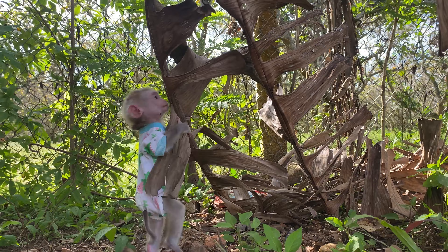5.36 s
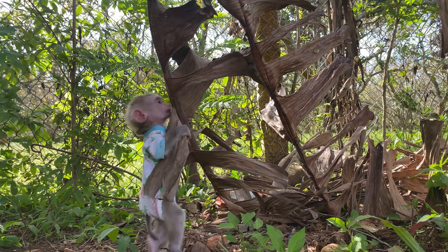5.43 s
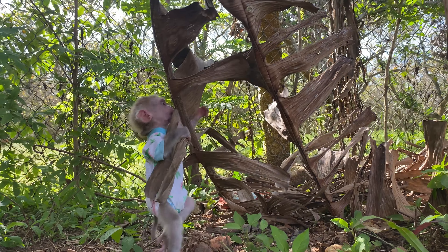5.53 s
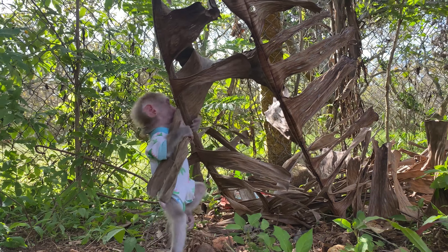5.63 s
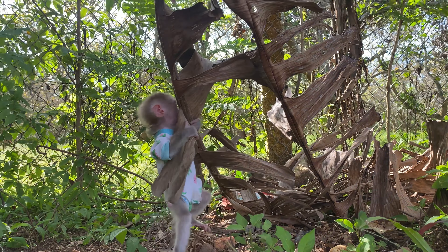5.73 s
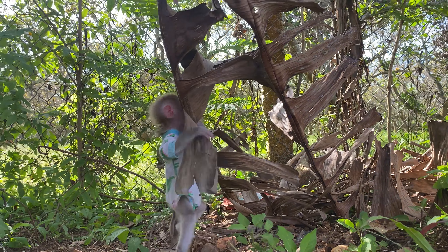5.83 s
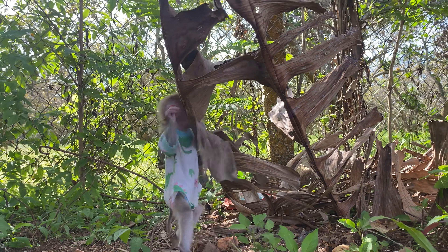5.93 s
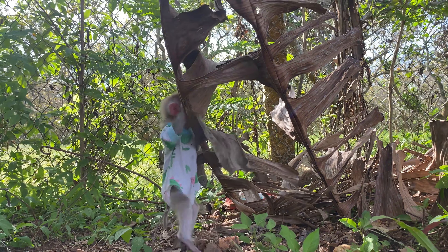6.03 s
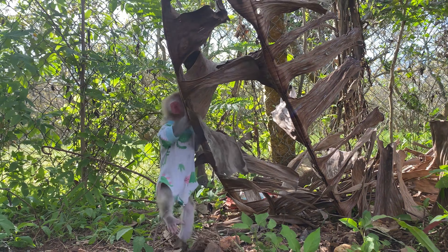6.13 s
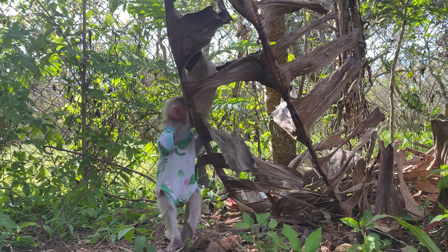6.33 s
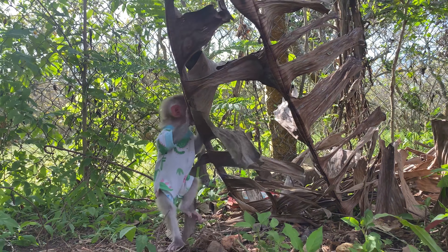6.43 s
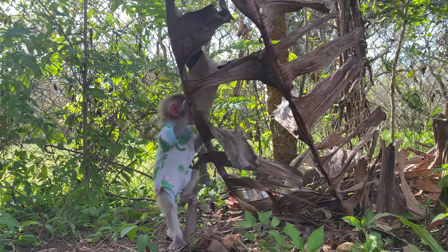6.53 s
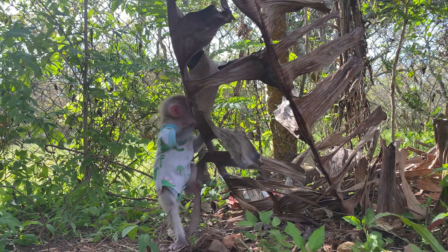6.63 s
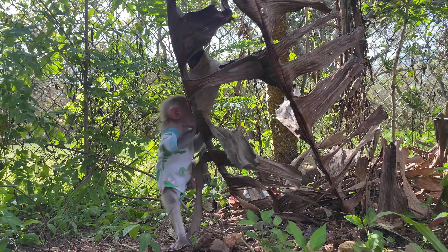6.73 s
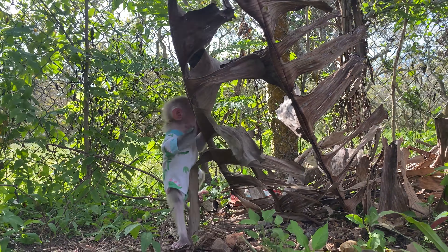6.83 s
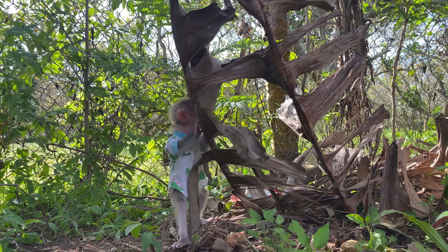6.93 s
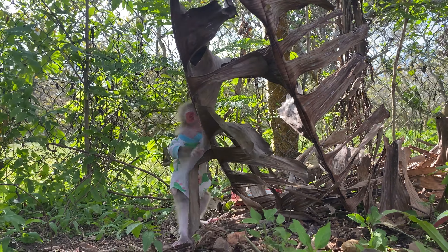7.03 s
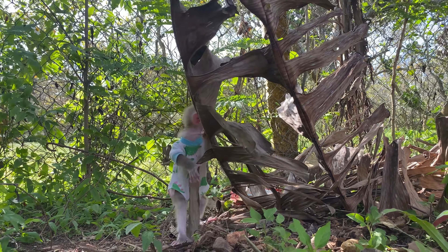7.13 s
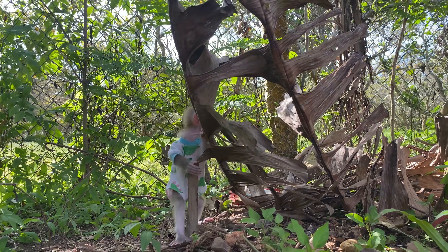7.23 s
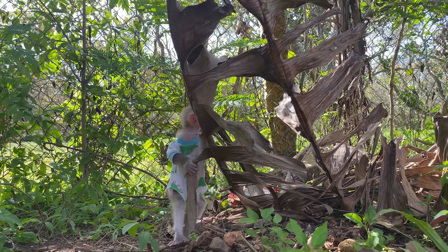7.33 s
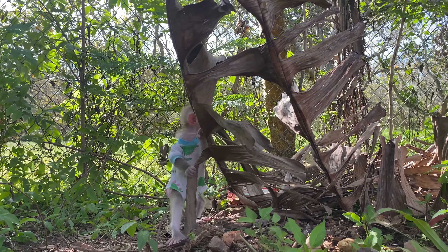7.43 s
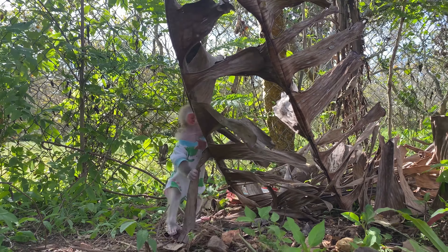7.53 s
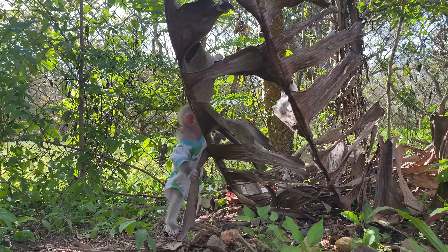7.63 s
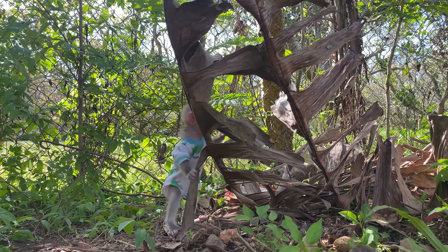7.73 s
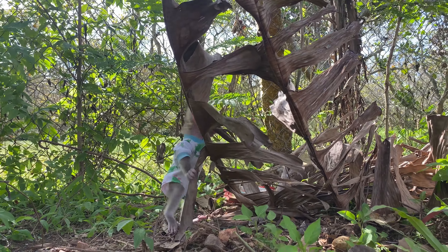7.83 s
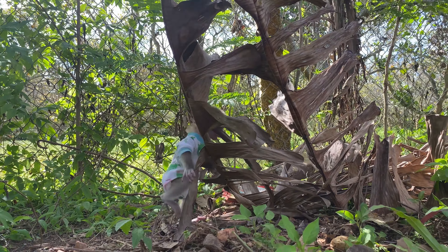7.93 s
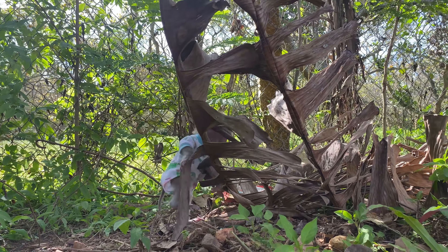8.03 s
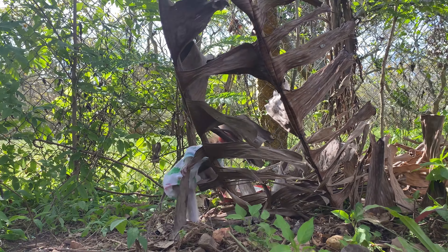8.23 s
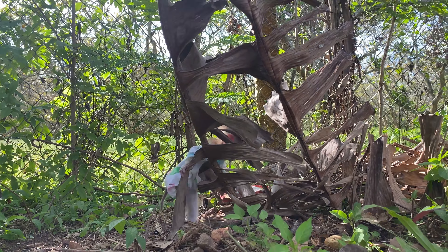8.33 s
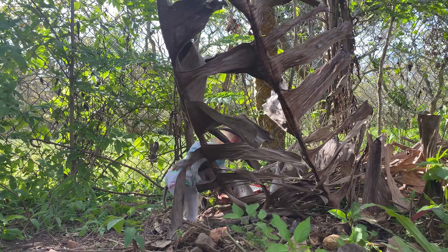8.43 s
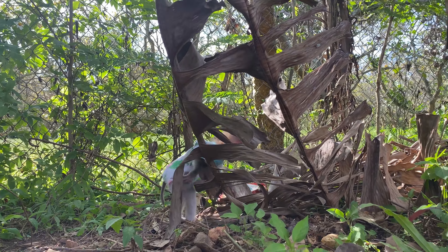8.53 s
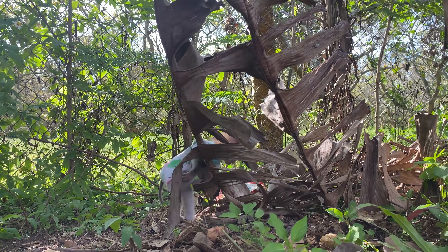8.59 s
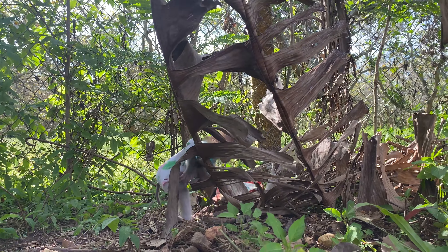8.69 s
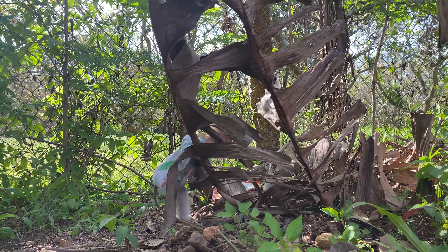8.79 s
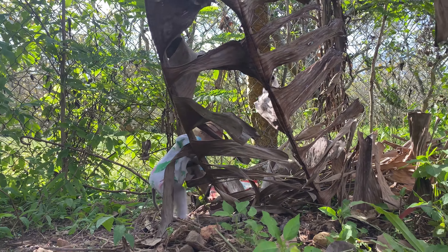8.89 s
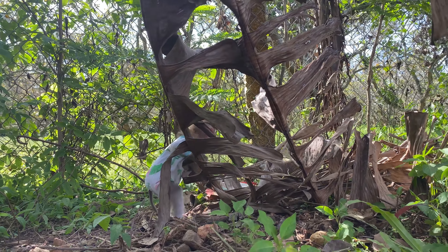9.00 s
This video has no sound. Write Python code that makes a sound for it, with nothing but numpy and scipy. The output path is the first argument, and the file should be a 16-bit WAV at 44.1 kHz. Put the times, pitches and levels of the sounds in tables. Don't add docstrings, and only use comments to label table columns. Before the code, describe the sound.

A small monkey tugs at large dry palm leaves in a garden, very close to a phone. Dense scraping and crackling open, with loud snaps in the first second, and gusts thump low on the microphone. Just after two seconds the wind grows sheltered; separate crackles, cracks and dull stalk taps follow, thinning out. A faint high insect trill flutters in near the end.

```python
import sys
import numpy as np
from scipy import signal
from scipy.fft import rfft, irfft, next_fast_len
from scipy.io import wavfile
from scipy.ndimage import uniform_filter1d, map_coordinates

SR = 44100
rng = np.random.default_rng(int(sys.argv[2]) if len(sys.argv) > 2 else 0)


def volts_from_decibels(level):
    exponent = np.asarray(level, float) / 20
    return 10 ** exponent


def int16_out(signal):
    q = np.round(np.clip(np.atleast_2d(signal).T, -1, 1) * 32767)
    wavfile.write(sys.argv[1], SR, q.astype(np.int16))


N = 399546
CHANGE_S = 2.2
CROSS_HZ = 6150

# hz, level_db
BLADE_COLOUR = [(500, -37), (1350, -4), (2200, -1.5), (3300, 1.5), (4700, -1), (6200, -4), (8500, -1),
                (11000, -70)]
# hz, level_db
STALK_COLOUR = [(80, -21.5), (200, -7.5), (420, -7.5), (680, -8), (1100, -6), (2500, -26)]
# hz, level_db
FIZZ_COLOUR = [(6500, -16.5), (9000, -5), (12000, -8), (15600, -7), (16000, -86), (16800, -65),
               (17000, -100)]

STALK_HZ = 481
KNOCK_FIZZ_DB = -19


def unit(x):
    return x / np.sqrt(np.mean(x ** 2) + 1e-20)


def along(points, hz):
    f, v = np.transpose(points)
    return np.interp(np.log(hz + 1), np.log(f + 1), v)


def curves(rows):
    s, *cols = np.transpose(rows)
    return [np.interp(np.arange(N) / SR, s, c) for c in cols]


def wobble(rate):
    return map_coordinates(rng.standard_normal(N // 100), [np.arange(N) * rate / SR])


def filtered(x, response):
    m = next_fast_len(N + SR // 4)
    return irfft(rfft(x, m) * response(np.fft.rfftfreq(m, 1 / SR)), m)[..., :N]


def hiss(spectrum, patchy_db):
    z = signal.stft(rng.standard_normal((2, N)), nperseg=256)[2]
    field = uniform_filter1d(rng.standard_normal(z.shape[1:]), size=6, axis=0)
    field = uniform_filter1d(field, size=7, axis=1)
    pair = signal.istft(z * volts_from_decibels(patchy_db * unit(field)), nperseg=256)[1][:, :N]
    return unit(filtered(pair, lambda hz: volts_from_decibels(along(spectrum, hz))))


def swells(rows, rest_db):
    swing_db = 20
    t = np.arange(0, N + 64, 64) / SR
    s, db, swell_s, fade_s = np.transpose(rows)[..., None]
    away = np.where(t < s, (s - t) / np.abs(swell_s), (t - s) / np.abs(fade_s))
    each_db = db - swing_db * away
    total_db = 10 * np.log10(np.sum(volts_from_decibels(2 * each_db), axis=0) + 1e-30)
    pulls_db = np.interp(np.arange(N) / SR, t, total_db)
    return 10 * np.log10(volts_from_decibels(2 * pulls_db) + volts_from_decibels(2 * rest_db))


def crackle(rate, spread_db, t60):
    chance, size = rng.random((2, N))
    happens = chance < rate / SR * volts_from_decibels(5 * wobble(14))
    starts = happens * volts_from_decibels(-spread_db * np.log(size + 0.003))
    return signal.lfilter([1], [1, -volts_from_decibels(-60 / (t60 * SR))], starts)


def crinkles(count, centre_hz, cycles, spread_db):
    when, pitch, size, phase, other = rng.random((count, 5)).T[..., None]
    clumps = np.cumsum(volts_from_decibels(4.5 * wobble(40)))
    at = np.searchsorted(clumps / clumps[-1], when) + np.arange(256)
    hz = centre_hz * np.exp(.85 * (2 * pitch - 1))
    t = np.arange(256) / SR
    decay = np.exp(-t * hz / cycles) * (1 - np.exp(-t * hz * 2))
    life = volts_from_decibels(-spread_db * np.log(size + 0.0054)) * decay
    pops = [life * np.sin(2 * np.pi * (hz * t * shift + phase)) for shift in (1, 0.49 + 0.66 * other)]
    return unit(np.array([np.bincount(at.ravel(), p.ravel(), N + 256)[:N] for p in pops]))


def rustle():
    # strongest_s, scrape_db, swell_s, fade_s
    tugs = [(.005, -41.5, 0.15, 0.31), (.215, -36, 0.14, 0.088), (.4, -43, 0.036, 0.91),
            (.723, -37, 0.64, 0.19), (.876, -56, 0.26, 0.75), (1.023, -38, 1, 0.13),
            (1.265, -44, 0.46, 0.082), (1.44, -53, 0.3, 0.33), (1.527, -43, 0.81, 0.29),
            (1.754, -48, 0.44, 0.1), (1.831, -50, 0.048, 0.15), (2.115, -47.5, 0.52, 0.21),
            (2.32, -52.5, 0.98, 0.71), (2.527, -40, 0.041, 0.11), (2.607, -47, 0.16, 0.017),
            (2.666, -50, 0.042, 0.19), (2.821, -38, 0.068, 0.051), (2.931, -47.5, 0.042, 0.11),
            (2.976, -51.5, 0.095, 0.026), (3.133, -51, 0.13, 0.17), (3.293, -57, 0.072, 0.11),
            (3.375, -53.5, 0.08, 0.46), (3.482, -46.5, 0.036, 0.05), (3.608, -59.5, 0.061, 0.066),
            (3.855, -61.5, 0.056, 0.058), (4.046, -47.5, 0.018, 0.11), (4.143, -42, 0.017, 0.062),
            (4.21, -51, 0.19, 0.26), (4.37, -47.5, 0.11, 0.22), (4.507, -48.5, 0.1, 0.039),
            (4.648, -43, 0.11, 0.053), (4.772, -34.5, 0.026, 0.052), (4.871, -44.5, 0.085, 0.15),
                  (4.964, -36.5, 0.12, 0.082), (5.072, -47, 0.13, 0.24), (5.259, -51.5, 0.98, 0.036),
                  (5.347, -42.5, 0.024, 0.12), (5.507, -45.5, 0.26, 0.2), (5.65, -51.5, 0.71, 0.98),
                  (5.867, -42, 0.06, 0.083), (6.004, -50, 0.026, 0.15), (6.265, -49, 0.095, 0.13),
                  (6.4, -62.5, 0.11, 0.15), (6.581, -47, 0.058, 0.2), (6.757, -41, 0.027, 0.02),
                  (7.04, -54, 0.86, 0.32), (7.23, -57.5, 0.036, 0.18), (7.434, -48.5, 0.097, 0.29),
                  (7.646, -52, 0.066, 0.019), (7.706, -52, 0.015, 0.029), (7.785, -55, 0.025, 0.18),
                  (7.876, -53, 0.21, 0.057), (7.98, -55.5, 0.048, 0.11), (8.047, -52, 0.1, 0.14),
                  (8.144, -53.5, 0.035, 0.2), (8.249, -55, 0.055, 0.19), (8.478, -50, 0.23, 0.11),
                  (8.538, -65, .07, .04), (8.668, -56.5, 0.074, 0.35), (8.932, -49.5, 0.19, 0.23)]
    # start_s, stalk_over_blade_db, edge_over_blade_db
    grip = [(0, -7, 1.5), (.3, -8, -0.5), (.7, -9, -2.5), (1.5, -4, -2), (2.2, -5, -6), (2.75, -8.5, -4),
            (3.5, -10, -2), (4, -9, -3), (4.5, -16, -8), (4.9, -9, -5), (5.4, -7, -5), (5.9, -4, -1.5),
            (6.4, -5.5, 2), (6.75, -6, 1.5), (7.1, -7.5, -2), (8, -5, 0.5), (8.6, -2.5, 0.5), (9.06, -8, 1)]
    scrape_db = swells(tugs, rest_db=-76)
    stalk_db, fizz_db = scrape_db + curves(grip)
    grains = unit(crackle(rate=320, spread_db=4.5, t60=0.042))
    pops = crinkles(count=8000, centre_hz=3516, cycles=1.04, spread_db=1.0)
    scrape = unit(.75 + 1.0 * grains) * hiss(BLADE_COLOUR, patchy_db=3.6)
    blade = .9 * scrape + .5 * pops
    edge = volts_from_decibels(fizz_db) * unit(0.97 + 1.35 * grains) * hiss(FIZZ_COLOUR, patchy_db=2.0)
    stalk = volts_from_decibels(stalk_db) * unit(1.3 + 0.39 * grains) * hiss(STALK_COLOUR, patchy_db=2.5)
    return volts_from_decibels(scrape_db) * blade + edge + stalk


def wind():
    # start_s, buffet_db
    buffet = [(0, -61), (2.2, -55.5), (2.25, -75), (2.6, -62), (4, -74.5), (4.3, -65.5), (5.6, -58),
              (6.1, -58.5), (6.3, -61.5), (6.85, -58), (7.6, -61), (9.06, -60.5)]
    # strongest_s, buffet_db, swell_s, fade_s
    gusts = [
        (.22, -54, 0.63, 0.025),
        (.53, -41, 0.16, 0.15),
        (.93, -46.5, 0.19, 0.22),
        (1.3, -64, 0.1, 0.38),
        (1.45, -46.5, 0.3, 0.052),
        (1.73, -44, 0.35, 0.061),
        (1.84, -46, 0.08, 0.25),
    ]
    # hz, level_db
    early_colour = [(15, -45), (30, -14), (55, 16), (95, 7), (170, -7), (300, -36), (500, -78)]
    # hz, level_db
    later_colour = [(20, -50), (35, -12.5), (55, 1), (95, -3.5), (140, -7.5), (220, -15), (500, -95)]
    later_wind = volts_from_decibels(0.5) * hiss(later_colour, patchy_db=2.0)
    early_wind = hiss(early_colour, patchy_db=-0.5)
    eddies = np.where(np.arange(N) / SR > CHANGE_S, later_wind, early_wind)
    level_db = swells(gusts, rest_db=curves(buffet)[0]) + 1.5 + 0.48 * wobble(7.5)
    return volts_from_decibels(level_db) * eddies


def resonance(hz, centre_hz, share):
    damping = 1j * hz * share * centre_hz
    return damping / (centre_hz ** 2 - hz ** 2 + damping)


def snaps(columns):
    size = 4096
    s, db, ring_hz, stalk_db, fizz_db, stalk_hz = columns
    t, hz = np.arange(size) / SR, np.fft.rfftfreq(size, 1 / SR)
    noise = rng.standard_normal((len(s), 2, 3, size)).transpose(2, 1, 0, 3)
    splinters_db = 1.65 * np.repeat(rng.standard_normal((len(s), 64)), 64, axis=1)

    def burst(t60):
        tear = volts_from_decibels(-60 * t / t60 + splinters_db)
        click = 2.8 * volts_from_decibels(-60 * t / .004)
        return (tear + click) * (1 - np.exp(-t / .00025))

    weight = np.clip(volts_from_decibels(0.146 * (stalk_db + 32.0)), .45, 2.5)
    brittle = np.clip(0.24 * volts_from_decibels(0.42 * (fizz_db + 9.0)), .1, .7)
    whole_blade = volts_from_decibels(along(BLADE_COLOUR, hz))
    blade = (brittle + resonance(hz, ring_hz, 0.048)) * whole_blade
    stalk = (0.12 + resonance(hz, stalk_hz, 0.084)) * volts_from_decibels(along(STALK_COLOUR, hz))
    edge = volts_from_decibels(along(FIZZ_COLOUR, hz))
    layers = [  # colour, level dB, t60 s
        (blade, db - 10.5, 0.036 * weight),
        (stalk, db + stalk_db - 5.5, .055),
        (edge, db + fizz_db - 8.5, 0.042 * weight),
        (whole_blade, db - 16, .010)]
    out = np.zeros((2, N + size))
    at = (np.round(s * SR).astype(int) + np.arange(size)).ravel()
    for source, (colour, level_db, t60) in zip([*noise, noise[2]], layers):
        tone = irfft(rfft(source) * colour)
        start_rms = tone[..., :SR // 400].std(axis=-1, keepdims=True)
        tone = tone / np.sqrt(tone.std(axis=-1, keepdims=True) * start_rms)
        tone = tone * burst(t60) * volts_from_decibels(level_db)
        out += [np.bincount(at, port.ravel(), N + size) for port in tone]
    return out[:, :N]


def small_fractures():
    # start_s, peak_db, ring_hz
    tick_rows = [(0.047, -32, 4690), (0.309, -45, 4760), (0.7063, -26, 2830), (0.968, -26, 3020),
                 (1.292, -35, 2550), (1.473, -43, 2650), (1.953, -42, 2500), (2.0063, -40, 2000),
                 (2.027, -48, 2200), (2.0951, -45, 4300), (2.117, -30, 3490), (2.2775, -36.5, 3560),
                 (2.706, -39, 1250), (2.787, -29, 1900), (2.8387, -32, 2400), (2.922, -31.5, 1240),
                 (2.939, -35.5, 3800), (3.1133, -40, 2200), (3.2555, -43, 2070), (3.466, -43, 3770),
                 (4.0826, -38, 3500), (4.182, -34, 2830), (4.206, -37, 2230), (4.295, -43, 2240),
                 (4.4827, -40, 1700), (4.4963, -45, 3450), (4.582, -41, 2100), (4.8274, -40, 4000),
                 (4.9574, -31, 3170), (5.2265, -37, 2125), (5.2776, -43, 2150), (5.6044, -34, 1160),
                 (5.6593, -42, 1870), (6.246, -46, 1290), (6.2664, -50, 1070), (6.5764, -36.5, 3000),
                 (6.7567, -36, 3770), (7.576, -46, 5100), (7.7704, -41, 1520), (8.1387, -38, 5300),
                 (8.39, -36, 1120)]
    # start_s, peak_db, ring_hz
    overtones = [
        (0.71, -18, 2100),
        (.747, -21, 1140),
        (4.867, -24, 1500),
        (.7595, -16.5, 4600),
    ]
    # start_s, peak_db, stalk_hz
    tap_rows = [(5.332, -48, 1150), (5.363, -40, 347), (5.477, -43, 423), (5.604, -48, 1160),
                (5.706, -43.5, 417), (5.747, -44.5, 407), (5.819, -51, 800), (6.577, -44, 272),
                (6.61, -45, 431), (6.746, -51, 620), (6.768, -40, 460), (6.976, -52, 1000), (7.0, -47, 545),
                (7.026, -47, 517), (7.066, -46.5, 418), (7.435, -57, 450), (8.046, -46, 402),
                (8.238, -45.5, 437), (8.388, -49, 1130), (8.417, -44.5, 1330), (8.472, -44, 1070),
                (8.531, -49, 810)]
    tick_stalk_db, tick_fizz_db = -59, -16
    tap_stalk_db, tap_ring_hz = 11, 1500
    ticks = [(s, db, hz, tick_stalk_db, tick_fizz_db, STALK_HZ) for s, db, hz in tick_rows + overtones]
    taps = [(s, db - tap_stalk_db, tap_ring_hz, tap_stalk_db, KNOCK_FIZZ_DB, hz) for s, db, hz in tap_rows]
    return np.array(ticks + taps).T[..., None]


def fractures():
    # start_s, peak_db, ring_hz, fizz_db
    cracks = [(.199, -23.5, 7160, -14), (.398, -29, 3740, -23), (.7598, -12.5, 2190, -61),
              (.7936, -26, 2100, -42), (.826, -24.5, 2455, -38), (1.6157, -31.5, 4080, -26),
              (2.5523, -23.5, 2040, -16), (2.6587, -28, 2930, -17), (2.766, -32.5, 2300, -10),
              (2.807, -19, 2140, -11), (2.9134, -36, 4160, -8), (2.9628, -33.5, 3700, -40),
              (3.2814, -37, 3950, -8), (4.134, -23.5, 2700, -16), (4.2468, -24.5, 2610, -13),
              (4.357, -24, 2200, -10.5), (4.372, -22, 2250, -11), (4.556, -31.5, 1784, -9),
              (4.596, -37, 4940, -26), (4.6173, -33.5, 3580, -19), (4.6372, -28.5, 3150, -9),
              (4.7506, -24.5, 2400, -9), (4.9307, -27, 1570, -23), (5.0769, -26, 2230, -16),
              (5.5013, -40.5, 2900, 2), (8.9028, -38, 1500, -19)]
    # start_s, peak_db, ring_hz, fizz_db
    tips = [(.1404, -23, 4120, -3), (.3663, -26.5, 4520, 3.5), (.5315, -26.5, 7300, -2),
            (.5866, -27.5, 2900, -6), (.6057, -26.5, 2080, 1), (.9315, -27, 4230, -1),
            (1.0084, -24, 3600, 1), (1.0256, -20, 2350, -8), (1.0895, -24, 7250, -5),
            (1.6945, -27.5, 3100, -6), (2.3445, -27.5, 5890, -6.5), (2.5306, -21, 2930, -3.5),
            (3.0956, -41, 2170, 2.5), (3.3016, -38, 3800, -7), (4.0449, -30, 3720, -11),
            (4.2231, -31, 3900, -8), (4.7755, -29.5, 2500, -1), (5.0596, -26.5, 1590, -10),
            (5.1262, -35.5, 2760, 0), (5.9019, -27, 3100, -3), (5.9936, -29, 7360, -9),
            (6.973, -31, 6740, -2.5), (8.5299, -27.5, 7040, -0.5), (8.5992, -44, 5150, 4.5),
            (8.6728, -41, 7600, 7), (8.7468, -35, 5200, 2.5)]
    # start_s, peak_db, ring_hz, fizz_db
    crunches = [(.556, -24, 2500, -0.5), (1.4094, -31, 2320, -3), (2.2064, -33, 4800, -2),
                (5.3332, -34, 2920, -3), (6.749, -27.5, 5670, -5), (7.305, -47, 2400, -16.5),
                (7.419, -37.5, 3820, 0), (7.5494, -39.5, 5130, 1), (7.694, -37.5, 2980, -13),
                (8.2329, -42, 4050, 6.5), (8.4162, -32.5, 2200, -3), (8.4712, -27.5, 6200, -0.5),
                (8.6549, -50.5, 3220, 18), (8.7091, -36.5, 3900, 6.5)]
    # start_s, peak_db, ring_hz, stalk_db, stalk_hz
    knocks = [(0.4328, -30.5, 2930, -7.5, 730), (0.486, -25.5, 1510, 1, 837), (0.7426, -14, 4470, -6, 1464),
              (1.3714, -31, 2430, -13, 587), (1.428, -30.5, 1360, -4.5, 269), (1.502, -28, 3580, -14, 990),
              (1.5294, -26, 1590, -4, 846), (1.816, -33, 1635, -20, 996), (2.4914, -34, 2360, -18, 264),
              (2.516, -33, 3770, -13, 301), (2.601, -19.5, 1936, -14, 545), (2.826, -29, 2200, -5.5, 454),
              (3.3741, -36.5, 2760, -22, 780), (3.487, -40, 1400, -4, 776), (4.334, -30.5, 3070, -13, 390),
              (4.8449, -34, 2330, -10, 956), (4.8664, -19, 2230, -13.5, 956), (5.4374, -32, 1230, -29, 401),
              (5.8503, -32.5, 1960, -19, 930), (6.5437, -37.5, 1380, -3.5, 510),
              (6.918, -43, 2810, -25, 751), (6.9427, -38.5, 2800, -13, 708), (5.863, -28.5, 2600, 0, 317),
              (6.66, -49.5, 1500, 5, 595)]
    kinds = [(cracks, -32), (tips, -30.5), (crunches, -18.5)]  # rows, stalk dB over blade
    light = [(s, db, hz, stalk_db, fizz_db) for rows, stalk_db in kinds for s, db, hz, fizz_db in rows]
    stalk_hz = STALK_HZ * np.exp(0.65 * rng.uniform(-0.77, 1, (len(light), 1)))
    heavy = [(s, db, hz, stalk_db, KNOCK_FIZZ_DB, low_hz) for s, db, hz, stalk_db, low_hz in knocks]
    return np.vstack([np.hstack([light, stalk_hz]), heavy]).T[..., None]


def thumps():
    # start_s, peak_db, pitch_hz
    eddies = [
        (0.502, -38, 60),
        (.527, -37, 60.1),
        (1.255, -45, 69.4),
        (1.345, -41, 59.7),
        (1.439, -43, 60),
        (1.672, -33.5, 73),
        (1.714, -29, 64.4),
        (1.838, -38, 62),
        (1.97, -43, 60),
    ]
    s, db, hz = np.transpose(eddies)[..., None]
    turns = np.clip(np.arange(int(CHANGE_S * SR)) / SR - s, 0, None) * hz
    swing = np.sin(2 * np.pi * turns) * np.exp(-turns / 1.1)
    push = np.sum(volts_from_decibels(db + 3) * swing, axis=0)
    return np.pad(push, (0, N - len(push))) * [[1], [.2]]


def insect():
    # start_s, pitch_hz, level_db
    trill = [
        (6.8, 4850, -79),
        (7.2, 4990, -67),
        (7.36, 5140, -63.5),
        (7.6, 5210, -62),
        (7.9, 5040, -61.5),
        (8.02, 5100, -61),
        (8.1, 5110, -61.5),
        (9.06, 5140, -62),
    ]
    pitch_hz, level_db = curves(trill)
    t = np.arange(N) / SR
    strokes = 1 + 0.46 * np.sin(2 * np.pi * 55 * t + 1.2 * wobble(17))
    turns = np.cumsum(pitch_hz + 35 * wobble(150)) / SR
    tone = np.sin(2 * np.pi * turns + [[0], [1.2]])
    return (t > trill[0][0]) * volts_from_decibels(level_db + 2.2 * wobble(70)) * strokes * tone


def ports(pair, alike, low_s, bend, high_s, turn, pan_db):
    def response(hz):
        body = bend * np.exp(-np.log(hz / 800 + 1e-9) ** 2 * 4.7)
        side = np.array([[.5], [-.5]])
        pan = volts_from_decibels(side * pan_db * np.clip(hz / 400, 0, 1))
        low = pan * np.exp(1j * side * (2 * np.pi * hz * low_s + body))
        high = np.exp(1j * side * (2 * np.pi * hz * high_s + turn))
        fade = np.pi / 4 * (1 + np.tanh((hz - CROSS_HZ) / 200))
        return np.cos(fade) * low + np.sin(fade) * high

    def mix(hz):
        angle = np.arccos(np.clip(along(alike, hz), 0, 1)) / 2
        return np.array([np.cos(angle), np.sin(angle)])

    same, other = filtered(pair, mix)
    return filtered(np.array([same + other, same - other]), response)


def scene():
    # hz, likeness
    alike = [
        [(60, .8), (500, .6), (2300, .8), (3600, .45), (4700, .7), (5600, .25), (6800, .84), (16000, .89)],
        [(60, .82), (500, .85), (1000, .74), (2000, .85), (4000, .76), (5600, .5), (7500, .84), (16000, .89)],
    ]
    # low_lead_s, low_extra_rad, high_lead_s, high_turn_rad, pan_db
    views = [
        (.00042, .9, -.000233, 3.75, 2),
        (-.000022, .05, .00016, -5.91, -1.2),
    ]
    pair = rustle() + wind() + snaps(small_fractures()) + snaps(fractures()) + thumps() + insect()
    after = np.arange(N) / SR > CHANGE_S
    return np.where(after, ports(pair, alike[1], *views[1]), ports(pair, alike[0], *views[0]))


def hollow_bands(x, gap_db, jump_db, burst_db, top_hz):
    hz, _, z = signal.stft([x[0] + x[1], x[0] - x[1]], SR, window="cosine", nperseg=2048)
    bands = (np.abs(z[:, :1024]) ** 2).reshape(2, 64, 16, -1).sum(axis=2)
    bands = uniform_filter1d(bands, size=5, axis=2)
    band_hz = hz[:1024:16, None]
    treble = uniform_filter1d(np.diff(x[0]) ** 2, size=128)[::128]
    before = uniform_filter1d(treble, size=8, origin=3)[:-1]
    jumps = treble[1:] / (volts_from_decibels(2 * jump_db) * before + 1e-20)

    def calm(starts):
        frame = np.arange(len(starts)) // 8
        return np.bincount(frame, starts, z.shape[-1])[:z.shape[-1]] == 0

    steady, tame = calm(jumps > 1), calm(jumps > volts_from_decibels(2 * burst_db))
    weak = (bands < volts_from_decibels(-2 * gap_db) * bands[::-1]) & (band_hz > [[[CROSS_HZ]], [[1600]]])
    dropped = weak & steady | (band_hz > top_hz) & tame
    z[:, :1024] *= ~np.repeat(dropped, 16, axis=1) & (hz[:1024, None] < 16900)
    total, gap = signal.istft(z, window="cosine", nperseg=2048)[1][:, :N]
    return np.array([total + gap, total - gap]) / 2


def roll_off(x):
    return signal.sosfilt(signal.butter(12, 16990, fs=SR, output="sos"), x)


def record(dry):
    mix = hollow_bands(dry, gap_db=6.3, jump_db=7, burst_db=10, top_hz=15700)
    return roll_off(mix)


dry = scene()
out = record(dry)
int16_out(out)
```